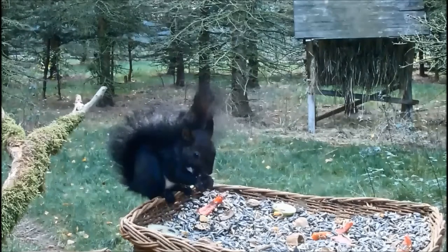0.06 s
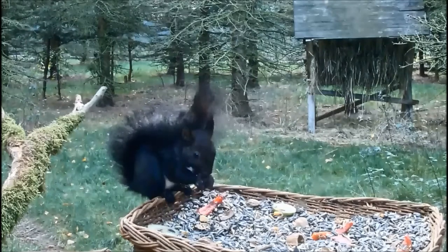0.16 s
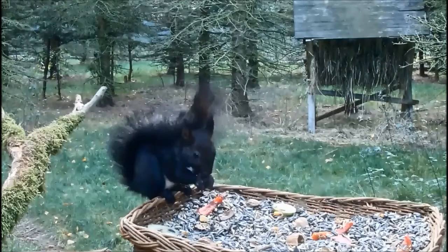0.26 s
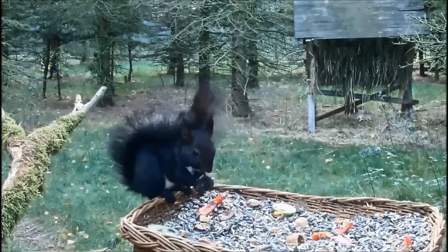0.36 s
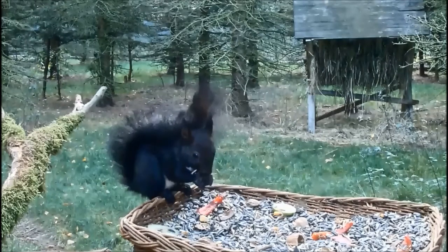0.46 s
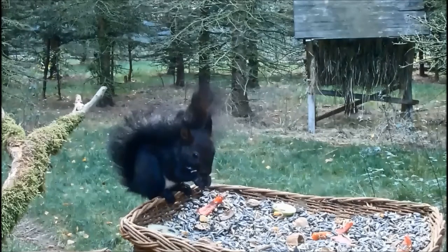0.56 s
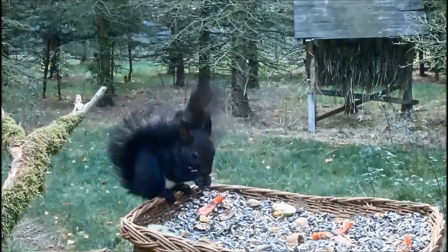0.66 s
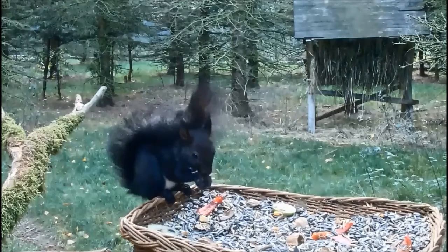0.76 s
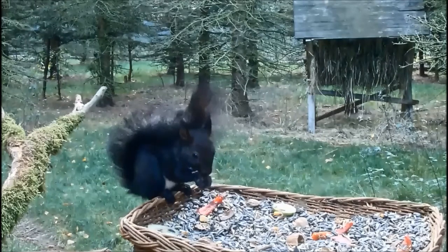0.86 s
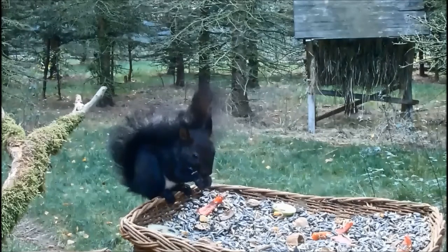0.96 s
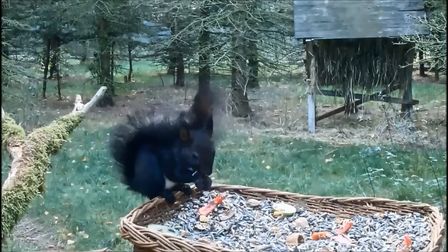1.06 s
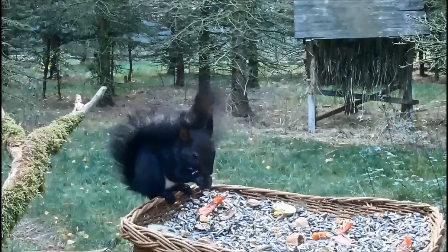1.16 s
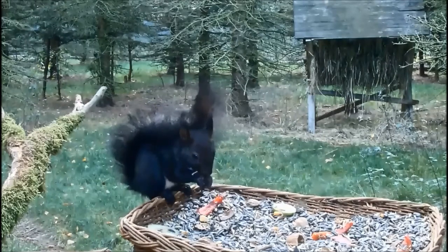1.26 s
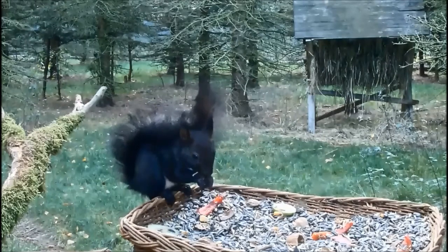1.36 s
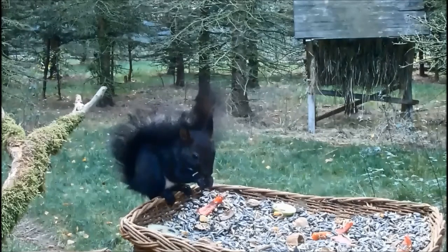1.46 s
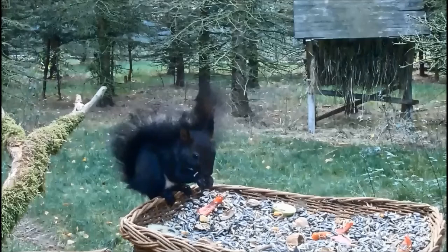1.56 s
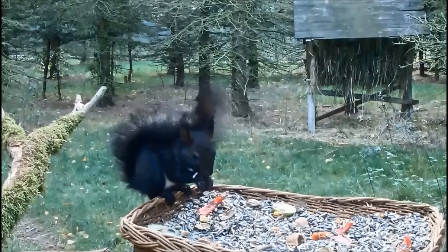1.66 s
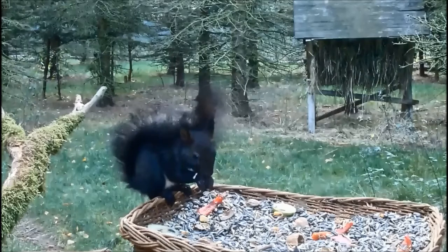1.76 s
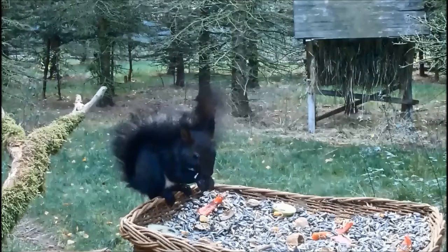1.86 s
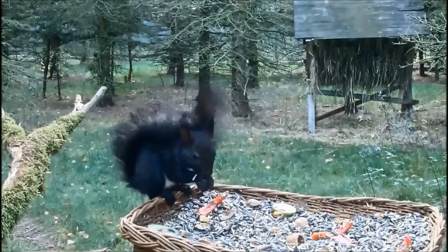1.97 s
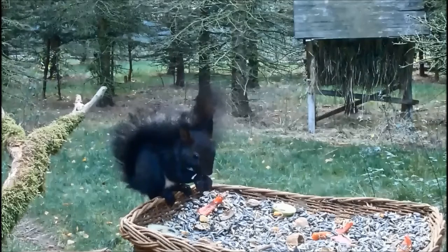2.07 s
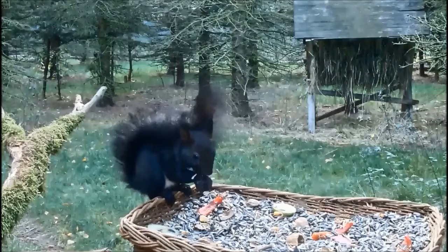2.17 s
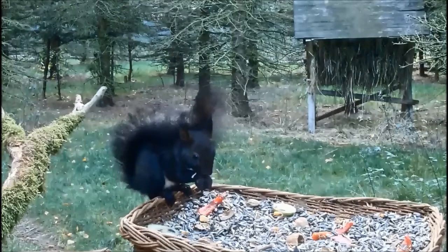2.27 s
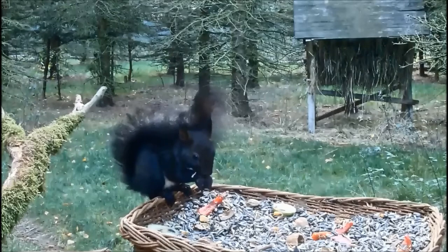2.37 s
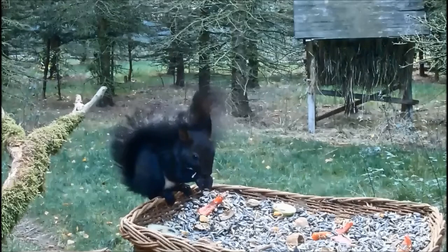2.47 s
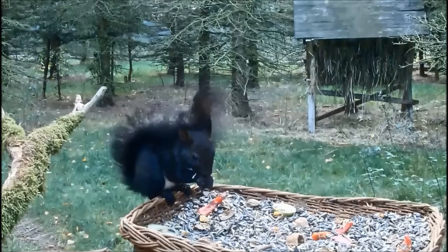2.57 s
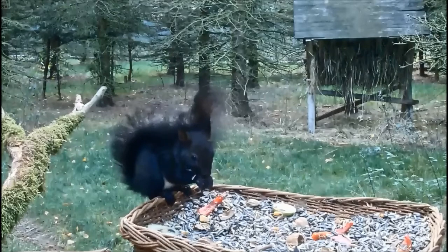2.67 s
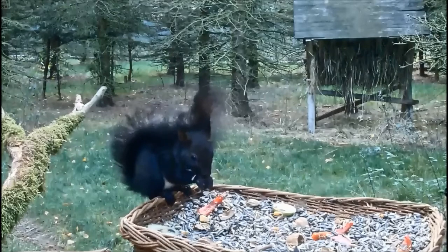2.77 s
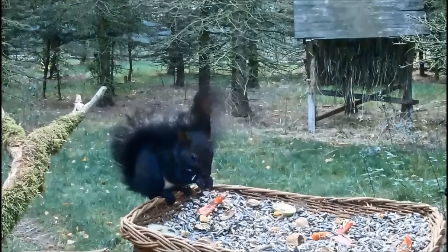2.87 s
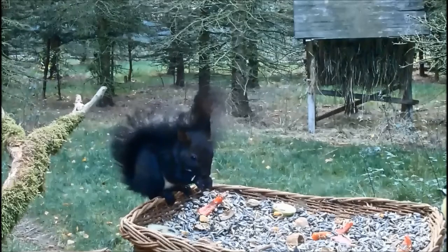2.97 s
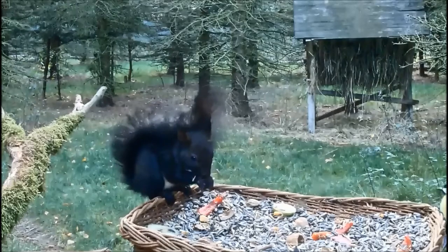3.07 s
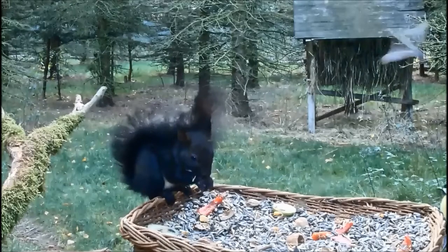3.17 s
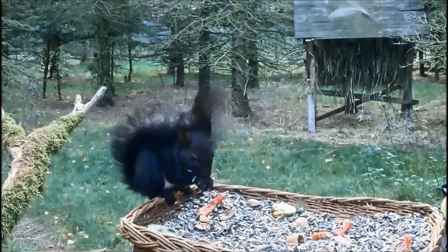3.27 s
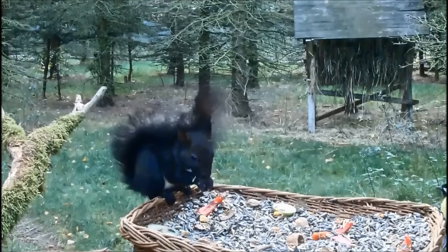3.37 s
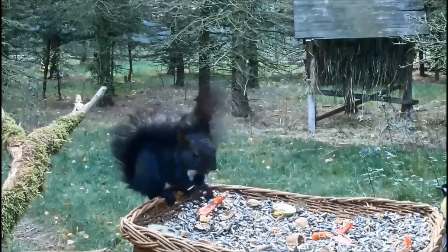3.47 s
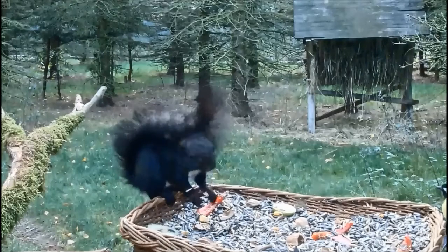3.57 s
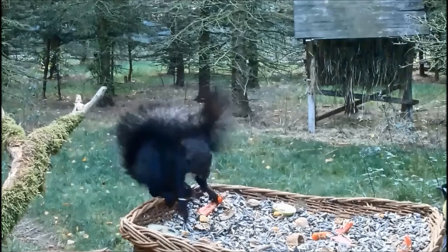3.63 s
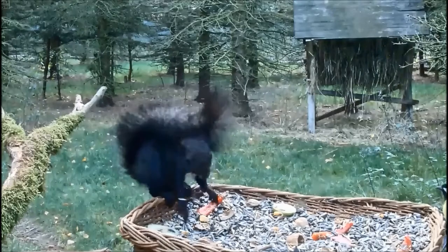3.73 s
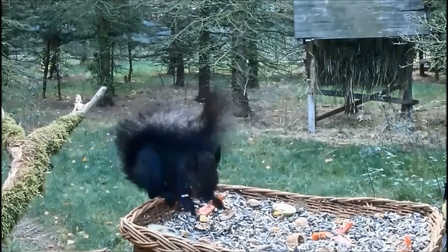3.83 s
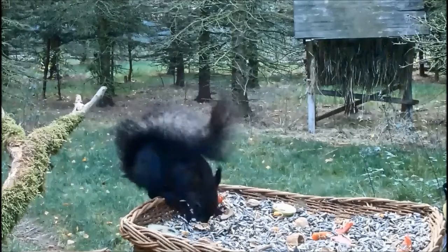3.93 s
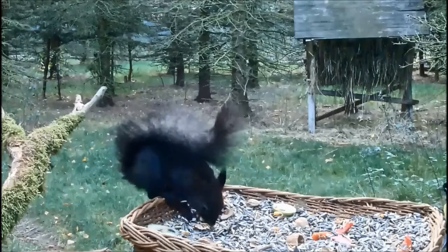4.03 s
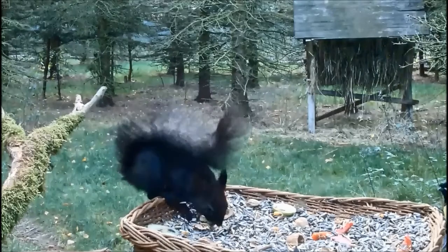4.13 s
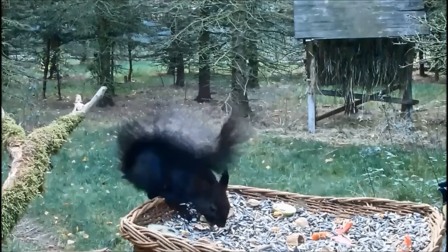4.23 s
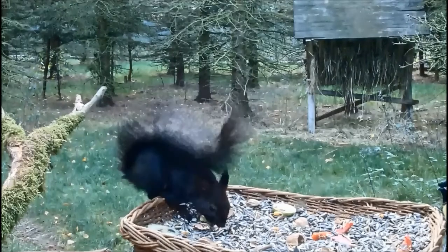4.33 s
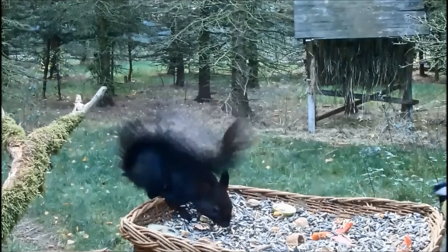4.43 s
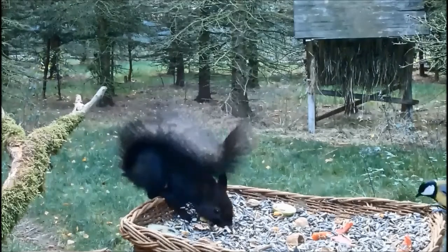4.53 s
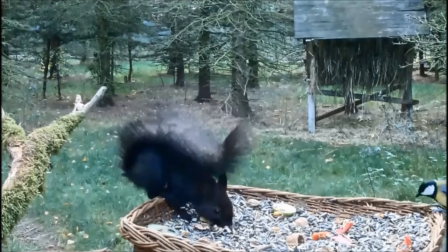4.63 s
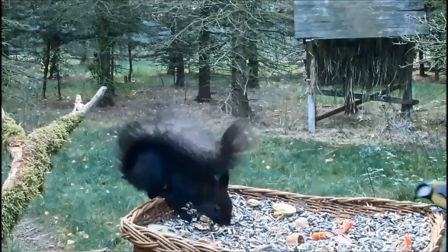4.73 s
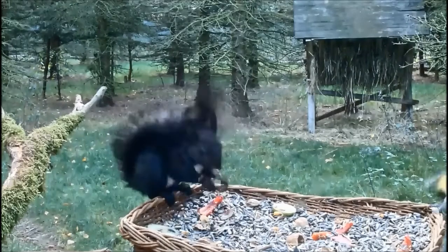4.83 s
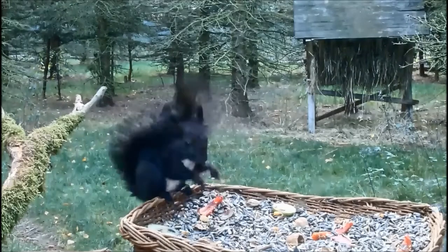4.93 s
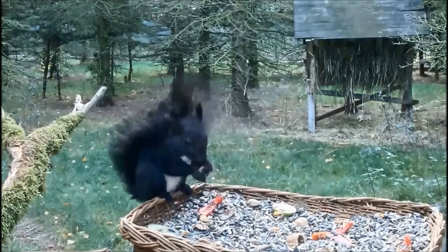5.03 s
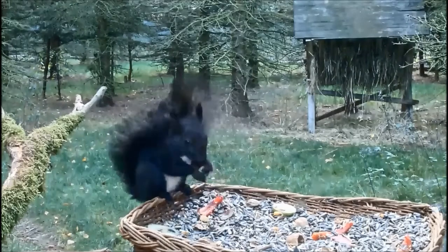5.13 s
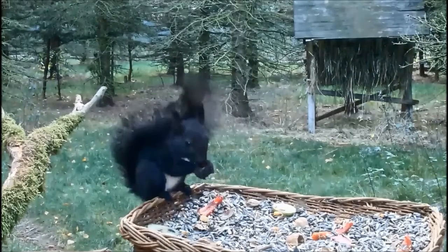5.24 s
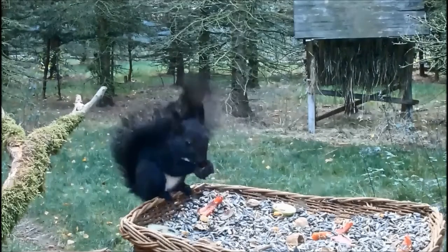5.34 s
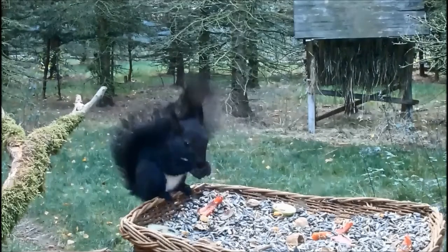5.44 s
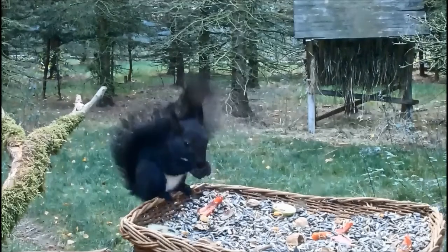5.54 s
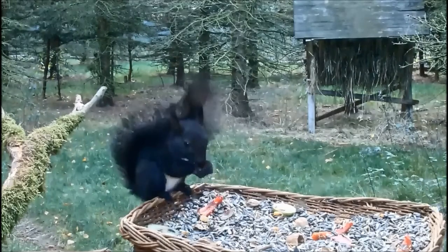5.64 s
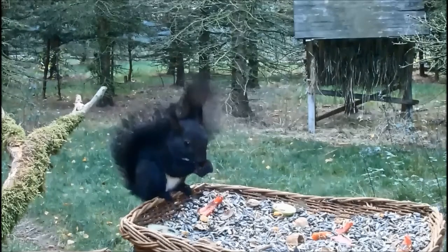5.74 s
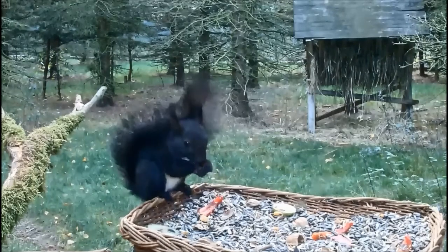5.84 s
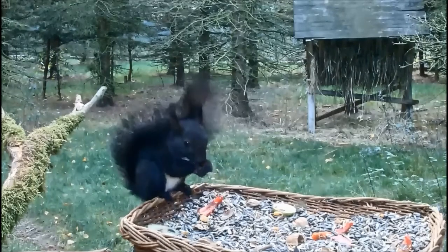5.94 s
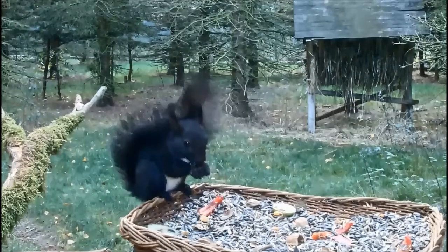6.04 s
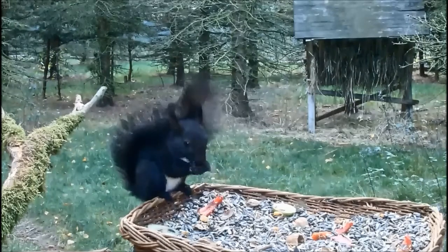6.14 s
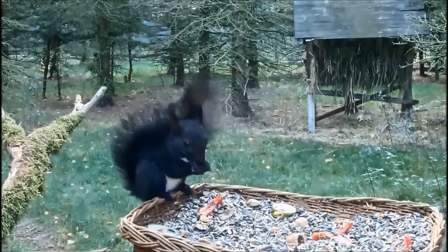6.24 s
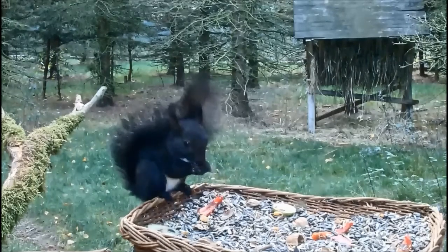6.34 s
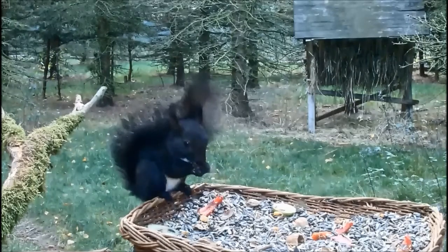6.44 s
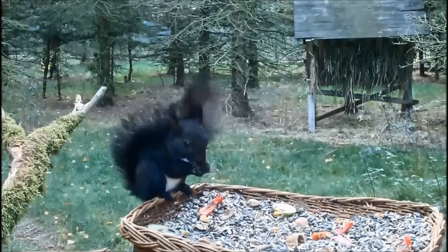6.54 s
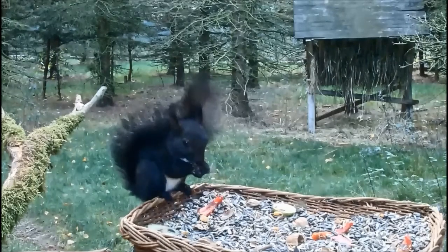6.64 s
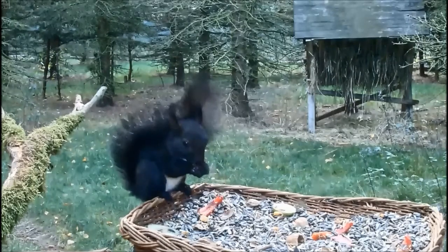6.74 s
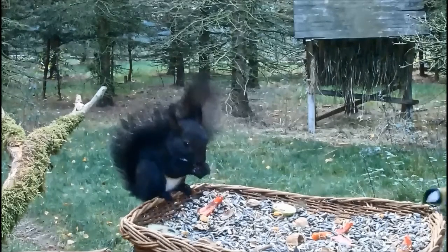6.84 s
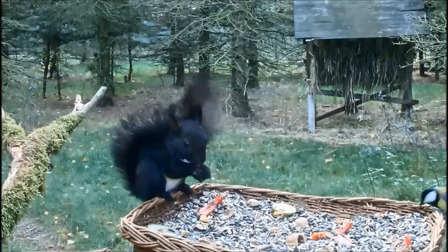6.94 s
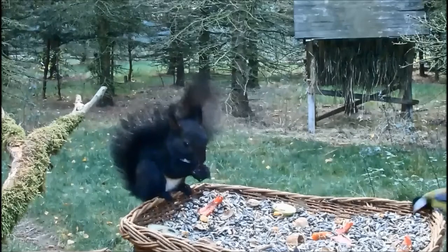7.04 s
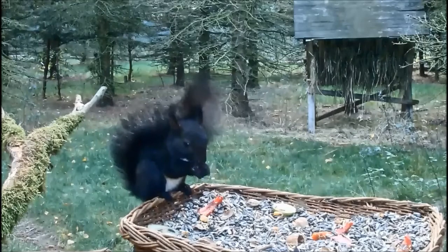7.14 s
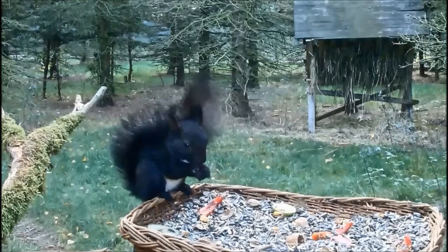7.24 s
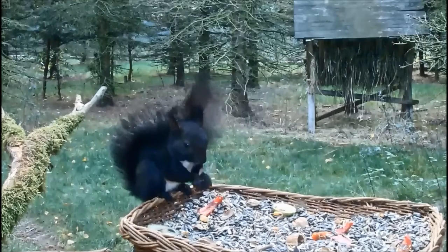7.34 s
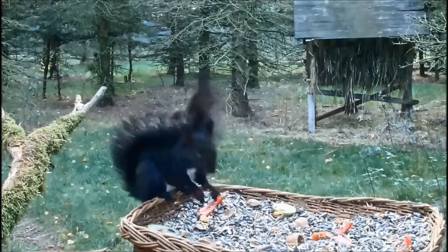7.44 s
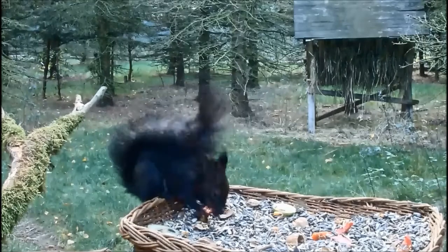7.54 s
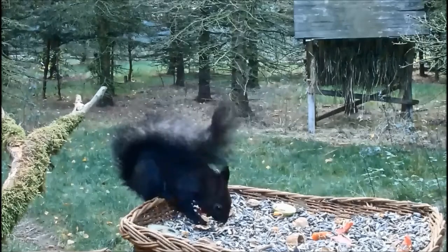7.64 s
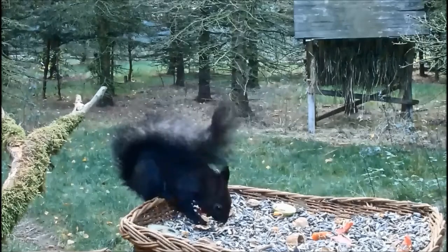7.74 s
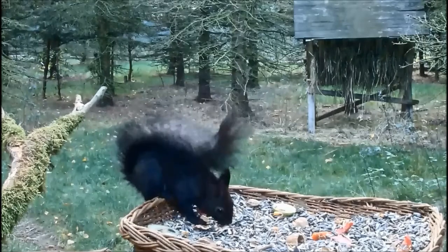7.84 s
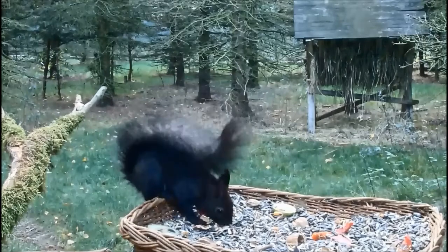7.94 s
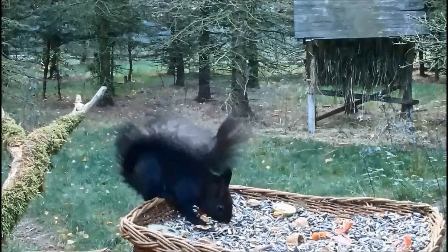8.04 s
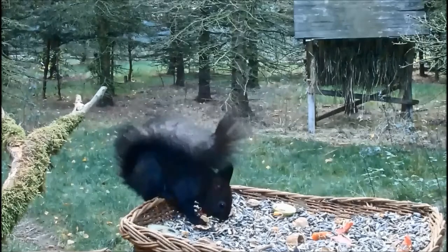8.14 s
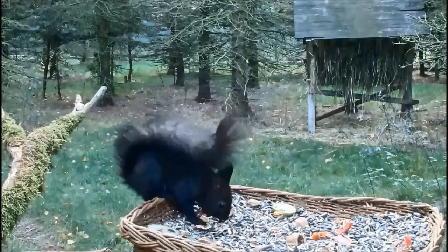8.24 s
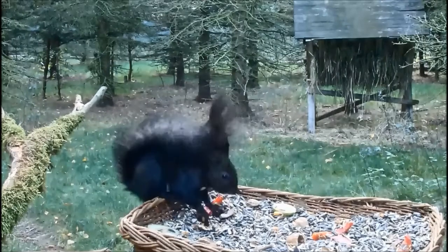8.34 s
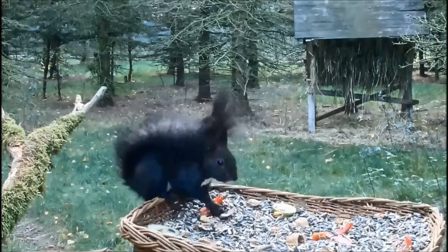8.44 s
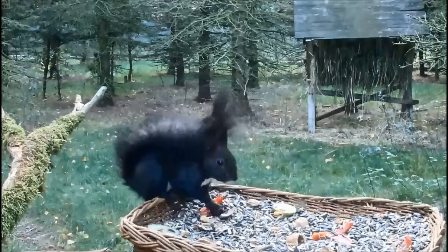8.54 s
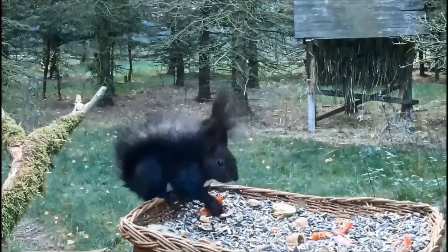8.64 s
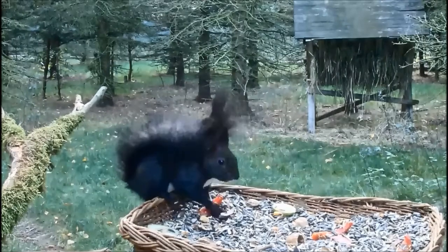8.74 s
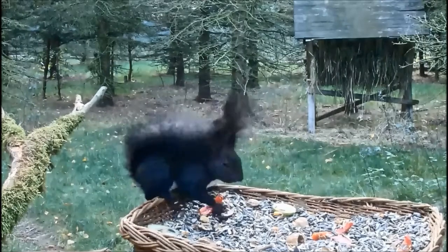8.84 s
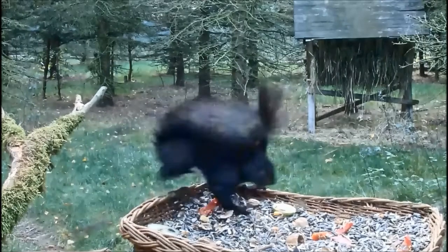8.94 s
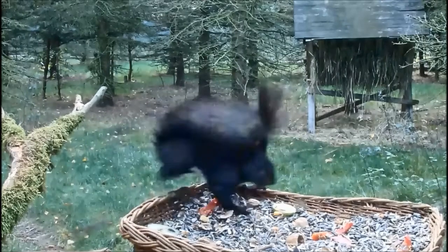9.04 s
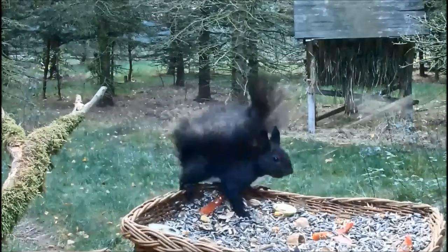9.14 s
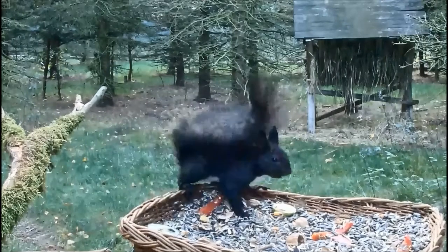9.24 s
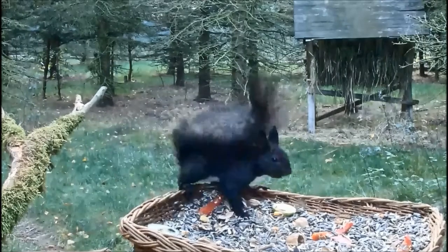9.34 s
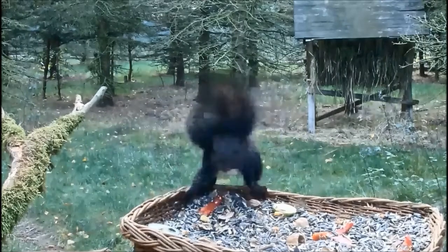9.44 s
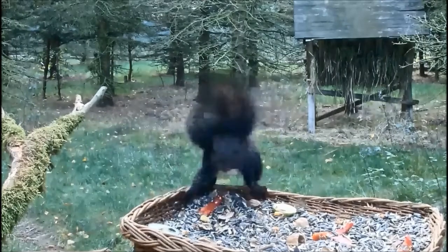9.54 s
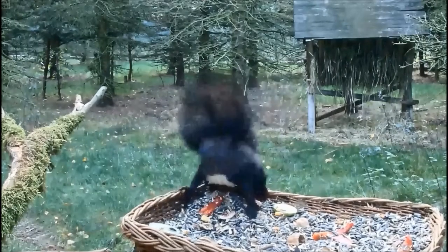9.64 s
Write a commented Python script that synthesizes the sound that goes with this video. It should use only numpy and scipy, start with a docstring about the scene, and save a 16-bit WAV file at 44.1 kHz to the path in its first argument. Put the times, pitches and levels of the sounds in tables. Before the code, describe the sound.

Crisp little seed cracks and high bird calls over a faint outdoor rumble, ending in louder rustling and bumps as a squirrel rummages.

```python
"""A squirrel cracks seeds on a wicker tray in a wood. Each crack makes the kernel and shell ring,
and loose husks rustle. Small birds chip, whistle and call in sliding tones that echo off the trees,
and one flutters past. Far traffic and wind make a low background. Near the end the squirrel turns and
rakes through the seeds: the tray rustles, thumps and shakes the microphone's mount."""
import sys
import numpy as np
from scipy import signal
from scipy.fft import rfft, irfft, next_fast_len
from scipy.io import wavfile
from scipy.ndimage import uniform_filter1d

SR = 44100
rng = np.random.default_rng(int(sys.argv[2]) if len(sys.argv) > 2 else 0)


def inscribe(sig):
    """Save sig as 16-bit PCM at rate SR to the path in sys.argv[1].

    A 1-D sig is mono; a 2-D sig holds one channel per row.
    Samples are clipped to [-1, 1] before scaling.
    """
    pcm = np.round(np.clip(np.atleast_2d(sig).T, -1, 1) * 32767)
    wavfile.write(sys.argv[1], SR, pcm.astype(np.int16))


N = 427769


def amp(db):
    return 10 ** (np.asarray(db) / 20)


def combined_gain(*db):
    """Add the power of several dB levels and give back one gain."""
    return np.sqrt(sum(amp(level) ** 2 for level in db))


def unit_power(x):
    return x / np.sqrt(np.mean(x ** 2) + 1e-20)


def value_at(points, hz):
    """Read between (Hz, value) points, giving each octave equal room."""
    freqs, values = np.transpose(points)
    return np.interp(np.log(hz + 1), np.log(freqs + 1), values)


def curves(rows):
    """Turn each column after the time into one value per sample."""
    times, *columns = np.transpose(rows)
    return [np.interp(np.arange(N) / SR, times, column) for column in columns]


def filtered(x, response):
    """Scale each frequency in x by response(hz)."""
    size = next_fast_len(N + SR // 2)
    return irfft(rfft(x, size) * response(np.fft.rfftfreq(size, 1 / SR)), size)[..., :N]


def add(track, start, sound):
    """Mix a sound into the track at a start time in seconds."""
    part = track[max(round(start * SR), 0):][:len(sound)]
    part += sound[:len(part)]


def noise(spectrum, patchy_db, grains=0, spread_db=0):
    """Noise with louder and softer patches; grains is the share of samples boosted into crackle."""
    spikes = (rng.random(N) < grains) * amp(spread_db * np.minimum(rng.exponential(size=N), 3))
    bands = signal.stft(rng.standard_normal(N) * (1 + spikes), nperseg=256)[2]
    drift = uniform_filter1d(uniform_filter1d(rng.standard_normal(bands.shape), 12, 0), 5, 1)
    patches = signal.istft(bands * amp(patchy_db * unit_power(drift)), nperseg=256)[1][:N]
    return unit_power(filtered(patches, lambda hz: amp(value_at(spectrum, hz))))


def tone(hz, gain):
    """A sine wave that follows a pitch and a gain, sample by sample."""
    return gain * np.sin(2 * np.pi * np.cumsum(hz) / SR)


def quaver(depth, samples):
    """The quick, random wobble in the loudness of a bird's voice."""
    return 1 + depth * unit_power(uniform_filter1d(rng.standard_normal(SR // 8), size=50))[:samples]


# How loud the far traffic is. Each row: time in seconds, level in dB.
TRAFFIC_LEVELS = [(0, -55.5), (3.67, -53.5), (4.7, -55.5), (5.46, -53), (7.08, -55), (7.38, -50.5),
                  (8.19, -54.5)]
# The tone of traffic, wind and far birds. Each row: frequency in Hz, relative level in dB.
RUMBLE_SPECTRUM = [(10, -9), (18, -0.5), (40, -0.5), (58, -6), (76, -4.5), (100, -13.5), (125, -19.5),
                   (160, -38), (280, -120)]
WIND_SPECTRUM = [(79, -23.5), (135, 3.5), (206, -3), (280, -5), (514, -5), (574, -6.5), (764, -4.5),
                 (1040, -8), (1210, -6.5), (1470, -18), (1690, -20.5), (2210, -28.5), (2600, -36.5),
                 (3380, -63), (5720, -120)]
TWITTER_SPECTRUM = [(1290, -38), (2200, -41), (2550, -1), (3940, 6), (5310, -10), (8000, -4), (10400, -16),
                    (17600, -120)]

def background(wind_db=-60, stir_db=-5, twitter_db=-77.5):
    """Traffic, wind and a blur of far birds. Raking shakes the mount and swells the two low sounds."""
    traffic_db, = curves(TRAFFIC_LEVELS)
    force_db, _, shake_db = raking()
    rumble = combined_gain(traffic_db, shake_db) * noise(RUMBLE_SPECTRUM, patchy_db=1.2)
    wind = combined_gain(wind_db, force_db + stir_db) * noise(WIND_SPECTRUM, patchy_db=0.86)
    return rumble + wind + amp(twitter_db) * noise(TWITTER_SPECTRUM, patchy_db=8)


# Spells of gnawing and nosing in the seeds.
# Each row: middle in seconds, length in seconds, level in dB, brightness in dB.
GNAWING = [(0.02, 0.26, -71.5, 4), (0.5, 0.15, -81, 4), (0.883, 0.078, -65, 0), (0.964, 0.053, -60.5, -1),
           (1.245, 0.083, -61.5, 0), (1.383, .14, -69, -4), (1.63, 0.2, -70.5, -1), (1.895, 0.28, -70, 2),
           (2.81, 0.54, -66, 1.5), (3.436, 0.36, -68.5, 5.5), (3.722, .12, -73, 8), (4.92, 0.096, -66.5, 3),
           (5.11, 0.18, -67.5, 0.5), (5.363, 0.44, -73.5, -8), (5.72, 0.31, -69, 0.5), (6.5, 0.45, -75, -3),
           (6.82, 0.27, -67.5, -2.5), (7.117, 0.3, -73, -8.5), (7.353, 0.26, -67, -4),
           (7.745, 0.48, -68.5, -9)]

def gnawing():
    """Each spell swells, holds and fades. Gives three dB curves: plain, minus and plus brightness."""
    t, power = np.arange(0, N, 64) / SR, 1e-14
    for middle, length, db, bright_db in GNAWING:
        swell = np.exp(-(2 * (t - middle) / length) ** 4)
        power = power + swell * amp(db + bright_db * np.array([[0], [-1], [1]])) ** 2
    return [np.interp(np.arange(N) / SR, t, 10 * np.log10(row)) for row in power]


# The tone of the tray, the husks and the fine chaff. Each row: frequency in Hz, relative level in dB.
WICKER_SPECTRUM = [(240, -32), (400, -8), (692, 3), (778, -8), (1030, -0.5), (1290, 8.5), (1460, 3),
                   (1720, 5.5), (2240, -6), (2600, -7), (3380, -8.5), (5720, -120)]
HUSK_SPECTRUM = [(1180, -26), (2000, -3.5), (2450, -8.5), (3420, 1), (3870, 3.5), (4450, 0), (5200, -6),
                 (6760, -41), (11400, -120)]
CHAFF_SPECTRUM = [(2650, -30), (4500, -11.5), (4930, -7.5), (5450, -4.5), (6510, -7), (9500, -29),
                  (12400, -65), (20900, -120)]

def rustle():
    """Husks and chaff shift like tiny grains, and the woven tray answers with a lower sound."""
    plain_db, dull_db, bright_db = gnawing()
    force_db, raked_db, _ = raking()
    wicker = noise(WICKER_SPECTRUM, patchy_db=2.5, grains=0.0032, spread_db=6)
    husks = noise(HUSK_SPECTRUM, patchy_db=1.8, grains=0.003, spread_db=7.5)
    chaff = noise(CHAFF_SPECTRUM, patchy_db=2.5, grains=0.0031, spread_db=8.5)
    # Each gain joins three levels: at rest, gnawing and raking.
    return (combined_gain(-70.5, dull_db - 3, force_db) * wicker
            + combined_gain(-74.5, plain_db, raked_db) * husks
            + combined_gain(-84, bright_db - 11, raked_db - 11) * chaff)


# Bird chips, and at 8.77 s one brief falling crackle from a seed. Each row: start in seconds, length in
# seconds, first and last pitch in Hz, level in dB.
CHIPS = [(0.015, .04, 3850, 3780, -60), (0.253, 0.013, 7500.0, 7400.0, -64),
         (1.251, 0.014, 3690, 2640.0, -48), (1.576, .012, 5960, 7500, -65), (1.592, .014, 4410, 3400, -57),
         (1.599, 0.022, 7450, 6640, -55), (1.665, 0.0195, 4190, 3480, -60),
         (1.746, 0.028, 4240, 3300.0, -62), (1.859, 0.014, 4460, 3210, -56.5),
         (1.972, 0.017, 3980, 3520, -61), (2.343, 0.024, 5600, 5200, -57), (2.636, 0.014, 7540, 6830, -68),
         (2.783, 0.015, 3970, 3070, -58), (2.829, 0.039, 7860, 6600, -64), (3.01, 0.019, 3730, 2690, -53.5),
         (4.042, .055, 4120, 4050, -69), (4.2, .022, 4100, 3900, -65), (4.235, .022, 3950, 3780, -66),
         (4.4, 0.024, 3950, 2430, -55), (4.463, 0.02, 3990, 2520, -51.5), (5.31, 0.018, 4150, 2620, -61),
         (5.57, 0.019, 3720, 2810.0, -58), (5.652, 0.018, 3600, 2500, -55), (5.729, 0.026, 3850, 2850, -52),
         (6.065, 0.033, 3550, 2910, -58), (6.224, 0.011, 3470, 2450, -54.5),
         (6.297, 0.031, 3910, 2550, -50), (6.414, 0.032, 3950, 2080, -51.5), (7.04, .09, 4020, 3980, -64),
         (7.13, .07, 4250, 4280, -66), (7.489, 0.031, 3950, 2450, -56), (7.521, .028, 2440, 2400, -65),
         (7.716, 0.021, 3710, 2870, -58), (8.135, 0.019, 3820, 2630, -50), (8.213, 0.028, 3980, 2750, -47),
         (8.77, .007, 5900, 4500, -41), (9.05, 0.022, 4450, 3800, -40), (9.092, 0.019, 2950, 3350, -41),
         (9.297, 0.025, 3500, 2850, -41.5)]

def chips():
    """Nearby birds make very short tones, nearly all sliding down. The very brief one at 8.77 s is a seed
    crackling under the paws."""
    track = np.zeros(N)
    for start, length, first_hz, last_hz, db in CHIPS:
        progress = np.arange(round(length * SR)) / (length * SR)
        pitch = first_hz + (last_hz - first_hz) * progress
        swell = np.sin(np.pi * progress) ** 0.7  # a power under 1 holds the level longer
        add(track, start, tone(pitch, amp(db) * swell * quaver(0.36, len(pitch))))
    return track


def ticks(per_second, start, floor_db):
    """Rows for small cracks at random times after start, each at least floor_db(time) loud."""
    span = N / SR - start
    when, pitch, kernel, shell = rng.random((round(per_second * span), 4)).T
    times = start + when * span
    kernel_db, shell_db = floor_db(times) - 4.5 * np.log(1 - 0.95 * np.array([kernel, shell]))
    return list(zip(times, kernel_db, 3100 + 1300 * pitch, shell_db))


# Seeds cracking. Each row: start in seconds, kernel peak in dB, kernel pitch in Hz, shell peak in dB.
CRACKS = [(0.098, -55, 3000, -66), (0.1733, -35.5, 3880, -47), (0.279, -49, 3700, -64),
          (0.305, -51, 3860, -61), (0.3354, -55, 3100.0, -54), (0.4464, -49, 3680, -42.5),
          (0.451, -55, 4400.0, -41), (0.4911, -66, 4000, -58), (0.517, -49, 4220, -54),
          (0.521, -50, 3750, -49), (0.529, -60, 3900.0, -43), (0.5634, -62, 4500.0, -48),
          (0.593, -43.5, 3150, -65), (0.7236, -39, 4200, -63), (0.745, -44, 3880, -41.5),
          (0.9098, -48, 3190, -64), (1.0006, -48, 3970, -58), (1.0443, -52, 3930, -58),
          (1.092, -41, 3920, -51), (1.1725, -50, 3200.0, -53), (1.1925, -43.5, 3880, -56),
          (1.2244, -49, 4500, -58), (1.2794, -48, 3870, -56), (1.3164, -49, 3100, -66),
          (1.3533, -56, 3740, -58), (1.513, -48, 3600, -54), (1.5975, -51, 3600.0, -48),
          (1.612, -49, 4200.0, -51), (1.7055, -46, 2900.0, -51), (1.796, -58, 4200.0, -53),
          (1.8395, -47, 2800, -58), (1.8927, -49, 4370, -50), (1.9094, -48, 3550, -60),
          (2.046, -46.5, 3760, -54), (2.083, -50, 4000.0, -69), (2.2915, -44.5, 4260, -42.5),
          (2.598, -48, 3830, -66), (2.6426, -53, 3500.0, -51), (2.8288, -49, 3600.0, -47),
          (3.008, -51, 4000.0, -54), (3.0244, -48, 3200.0, -64), (3.2746, -63, 4000.0, -50),
          (3.2827, -53, 3620, -58), (3.612, -48, 3740, -59), (3.7191, -42, 3700, -43),
          (3.9163, -38.5, 4100, -47), (3.9203, -56, 3700.0, -54), (4.0809, -51, 3440, -51.5),
          (4.585, -49, 3920, -63), (4.7953, -53, 3630, -50), (4.945, -56, 3800.0, -58),
          (5.0687, -47, 4060, -49), (5.246, -50, 3900.0, -50), (5.2967, -47, 4020, -59),
          (5.5321, -54, 3720, -54), (5.6845, -37, 4550, -56), (5.6881, -39, 4370, -39),
          (5.9841, -43, 3400, -49), (5.9884, -44, 3420, -61), (6.3847, -44, 4000, -45),
          (6.542, -50, 3020, -51), (6.5857, -49, 4000.0, -59), (6.5923, -45, 4000.0, -53),
          (6.6152, -48, 4120, -57), (6.7848, -48, 3620, -53), (6.8202, -48, 4340, -61),
          (6.8496, -47, 3550, -45.5), (6.926, -52, 3900.0, -65), (6.9469, -42, 4080, -50),
          (6.952, -52, 4400.0, -53), (7.007, -61, 3950, -51), (7.2775, -49, 3820, -57),
          (7.367, -46, 4430, -45.5), (7.374, -54, 4100.0, -53), (7.4572, -53, 3300.0, -56),
          (7.5904, -51.5, 3600.0, -66), (7.7351, -46, 3800.0, -56), (7.7405, -44, 4240, -60),
          (7.8643, -54, 3920, -58), (7.986, -54, 4100, -59), (8.0616, -52, 3400.0, -49),
          (8.1858, -51, 3740, -59), (8.228, -46, 3200.0, -54), (8.2804, -44, 3000.0, -62),
          (8.5193, -42, 3200.0, -47), (8.5926, -42, 4300.0, -39), (8.7834, -39, 3300.0, -39.5),
          (9.1592, -42, 3700.0, -36.5), (9.1973, -38, 3860, -40), (9.2325, -32.5, 3220, -41),
          (9.331, -35, 3430, -48), (9.3847, -33, 3100.0, -45), (9.6662, -25.5, 3480, -33),
          (9.6698, -25, 2820, -43)]

def cracks():
    """A seed breaks in a tiny burst that makes its kernel, shell and splinters ring."""
    track, t = np.zeros(N), np.arange(SR // 60) / SR
    faint_ticks = ticks(per_second=8, start=0, floor_db=lambda times: -64)
    for start, kernel_db, kernel_hz, shell_db in [*CRACKS, *faint_ticks, *crunches()]:
        burst = rng.standard_normal(len(t)) * amp(-60 * t / 0.014)
        burst[0] = 2.7  # the break starts with a sharp kick
        splinter_db = min(shell_db, -46) - 4.5
        rings = [(kernel_db, kernel_hz, 1600), (shell_db, 5500, 2600), (splinter_db, 11000, 9000)]
        for db, hz, width_hz in rings:
            ring = t * np.exp(-np.pi * width_hz * t) * np.sin(2 * np.pi * hz * t)
            struck = np.convolve(burst, ring[:160])[:len(t)]
            add(track, start, amp(db) * struck / np.abs(struck).max())
    return track


# Needle-thin snaps. Each row: start in seconds, level in dB before the low end is cut.
SNAPS = [(0.1733, -44), (0.2079, -39), (0.7442, -33), (4.37, -39), (5.688, -40), (5.7508, -39),
         (7.0045, -45), (7.1516, -42)]

def snaps(pitch_hz=12400, fade_s=0.0001, low_cut_hz=4000):
    """A very high ring that dies within a cycle or two."""
    track, t = np.zeros(N), np.arange(SR // 500) / SR
    for start, db in SNAPS:
        add(track, start, amp(db) * np.exp(-t / fade_s) * np.cos(2 * np.pi * pitch_hz * t))
    return filtered(track, lambda hz: hz ** 2 / (hz ** 2 + low_cut_hz ** 2))


# Held whistles. Each row: start in seconds, length in seconds, note in Hz, level in dB.
WHISTLES = [(.24, 0.039, 3900, -62), (4.49, 0.11, 4010, -65.5), (5.043, .05, 4040, -64),
            (5.068, 0.061, 3216, -64), (5.23, 0.11, 4090, -65), (5.398, 0.084, 4280, -52.5),
            (5.579, .082, 4240, -48.5), (5.779, 0.076, 4254, -49.5), (6.11, 0.087, 4335, -63.5),
            (6.189, 0.086, 4250, -54.5), (6.349, 0.088, 4225, -53), (6.542, 0.088, 4220, -57.5),
            (7.296, 0.044, 4230, -60), (7.882, 0.07, 4090, -60)]

def whistles():
    """Birds deep in the wood slide up into a note, then let it sag a little."""
    track = np.zeros(N)
    for start, length, note_hz, db in WHISTLES:
        t = np.arange(0, length, 1 / SR)
        scoop = 1.04 - 0.2 * np.exp(-t / 0.011) - 0.55 * t
        swell = np.clip(t / 0.04, 0.55, 1) * np.clip((length - t) / 0.0056, 0, 1)
        add(track, start, tone(note_hz * scoop, amp(db) * swell * quaver(0.16, len(t))))
    return track


# Taps on the tray. Each row: start in seconds, level in dB, pitch in Hz.
KNOCKS = [(0.518, -47, 1720), (1.919, -45, 497), (2.64, -44, 1190), (3.515, -50, 1780), (5.239, -47, 248),
          (5.245, -44, 680), (5.29, -42, 550), (5.47, -47, 260), (7.329, -44, 330), (7.417, -48, 1350),
          (7.457, -49, 1250), (7.508, -49, 1150), (7.591, -52, 1980), (7.734, -46, 1700),
          (8.001, -51, 1850), (8.26, -49, 1110), (8.28, -36, 1650), (8.318, -43, 1250), (8.79, -25, 1250),
          (8.8965, -27.5, 1490), (9.018, -28.5, 270), (9.33, -26, 1820), (9.666, -28.5, 1980),
          (9.67, -27.5, 1160), (9.68, -28, 1210)]

def knocks():
    """Taps sound dull because wicker stops every pitch from ringing almost at once."""
    track, t = np.zeros(N), np.arange(SR // 10) / SR
    for start, db, hz in KNOCKS:
        ring = np.sin(2 * np.pi * hz * t) * amp(-60 * t / 0.02)
        scuff = uniform_filter1d(rng.standard_normal(len(t)), size=6) * amp(-60 * t / 0.011)
        add(track, start, amp(db) * (ring + 0.11 * scuff))
    return track


# Nasal calls. Each row: start in seconds, base level in dB.
NASAL_CALLS = [(.828, -55), (0.936, -54), (3.413, -56.5), (3.511, -56), (3.686, -54), (3.781, -55.5)]
# The rise of one call. Each row: time into the call in seconds, base pitch in Hz.
NASAL_RISE = [(0, 996), (.014, 1370), (0.021, 1813), (.031, 2280), (.046, 2330)]
# The overtones that sound. Each row: multiple of the base pitch, level change in dB.
NASAL_OVERTONES = [(2, -3), (3, -10), (4, -15)]
# How the beak shapes them. Each row: frequency in Hz, level change in dB.
BEAK_RESPONSE = [(1900, -13), (2400, -3.5), (3000, -12), (3900, 5), (4700, -4.5), (6800, -10), (7600, -30)]

def nasal_calls():
    """A hoarse bird voice: overtones rise together and are shaped by the beak."""
    track = np.zeros(N)
    times, hz = np.transpose(NASAL_RISE)
    t = np.arange(0, times[-1], 1 / SR)
    pitch = np.interp(t, times, hz)
    swell = np.sqrt(np.sin(np.pi * t / times[-1]))
    for start, db in NASAL_CALLS:
        rasp = swell * quaver(0.7, len(t))
        for multiple, overtone_db in NASAL_OVERTONES:
            gain = amp(db + overtone_db + value_at(BEAK_RESPONSE, multiple * pitch))
            add(track, start, tone(multiple * pitch, gain * rasp))
    return track


# Low thumps. Each row: middle in seconds, peak in dB, length in seconds.
THUMPS = [(1.912, -41.5, 0.0078), (1.926, -47, 0.006), (2.349, -49, 0.0042), (5.48, -44, 0.01),
          (7.334, -43, 0.006), (9.018, -21, 0.021), (9.048, -22, 0.018), (9.066, -27, 0.0072),
          (9.085, -32, 0.028)]

def thumps():
    """Slow pushes reach the microphone through its mount, each the opposite way to the last."""
    track, t = np.zeros(N), np.arange(SR // 10) / SR
    for k, (middle, db, length) in enumerate(THUMPS):
        distance = 8 * ((t - 0.05) / length) ** 2  # grows away from the middle
        add(track, middle - 0.05, (-1) ** k * amp(db) * (1 - distance) * np.exp(-distance))
    return track


# A small bird flutters past. Each row: time in seconds, level in dB.
FLYBY_LEVELS = [(2.68, -90), (2.74, -65), (2.9, -66), (3.03, -65), (3.12, -65), (3.17, -88)]
# The tone of air through feathers. Each row: frequency in Hz, relative level in dB.
FEATHER_SPECTRUM = [(150, -20), (300, 2), (700, 6), (1400, -12.5), (1950, 2.5), (2500, -19), (4000, -5),
                    (8000, -28), (12000, -58)]

def wings(beats_per_s=23.4):
    """Every downstroke makes one short puff of air."""
    strokes = np.cos(np.pi * beats_per_s * (np.arange(N) / SR - 2.982)) ** 6
    return amp(curves(FLYBY_LEVELS)[0]) * unit_power(strokes) * noise(FEATHER_SPECTRUM, patchy_db=0.7)


def add_high_note(track, points, undertone_db=-18):
    """A voice follows (seconds, Hz, dB) points, with a weaker tone an octave below."""
    times, hz, db = np.transpose(points)
    t = np.arange(times[0], times[-1], 1 / SR)
    fade = np.clip(np.minimum(t - times[0], times[-1] - t) / 0.0026, 0, 1)
    pitch = np.interp(t, times, hz)
    gain = amp(np.interp(t, times, db)) * fade * quaver(0.16, len(t))
    add(track, times[0], tone(pitch, gain) + tone(pitch / 2, amp(undertone_db) * gain))


# One zigzag. Each row: time in seconds before stretching, pitch in Hz, level change in dB.
ZIGZAG_SHAPE = [(0, 7400, -4), (.009, 8300, -1), (0.017, 9600, -5), (0.024, 8750, 0), (.034, 9650, -4),
                (.044, 5800, 6)]
# Zigzag calls. Each row: start in seconds, base level in dB, time stretch (over 1 is slower).
ZIGZAGS = [(3.363, -53, 1.02), (9.468, -47, 0.87)]
# Thin sinking notes. Each row: start in seconds, length in seconds, first and last pitch in Hz,
# level in dB, random pitch scatter in Hz.
SEEPS = [(3.396, .082, 7490, 6790, -48.5, 40), (3.416, 0.079, 8630, 8300, -58.5, 150)]
# Notes that climb, then drop. Each row: start and climb time in seconds, first pitch in Hz, level in dB.
HOOKS = [(9.569, 0.016, 7440, -42.5), (9.598, .016, 6260, -37.5)]

def high_calls(waver_hz=200, wavers_per_s=33, top_hz=9100, end_hz=5500, hold_s=0.004, drop_s=0.006):
    """A tit sings thin, high tones: fast zigzags, wavering seeps and hooked notes."""
    track = np.zeros(N)
    for start, db, stretch in ZIGZAGS:
        points = [(start + stretch * at, hz, db + change) for at, hz, change in ZIGZAG_SHAPE]
        add_high_note(track, points, undertone_db=-8)
    for start, length, first_hz, last_hz, db, scatter_hz in SEEPS:
        t = np.linspace(0, length, num=24)
        pitch = first_hz + (last_hz - first_hz) * t / length
        pitch += waver_hz * np.cos(2 * np.pi * wavers_per_s * t)
        pitch += scatter_hz * rng.standard_normal(len(t))
        add_high_note(track, np.c_[start + t, pitch, db - 12 * (t / length) ** 4])
    for start, climb, hz, db in HOOKS:
        top = start + climb
        rise = [(start, hz, db), (start + climb / 2, (hz + top_hz) / 2, db), (top, top_hz, db - 15)]
        fall = [(top + hold_s, top_hz, db - 15), (top + hold_s + drop_s, end_hz, db)]
        add_high_note(track, rise + fall)
    return track


# The squirrel turns and rakes. Each row: time in seconds, force on the tray in dB,
# then the dB added to that force for the husks and for the shaking mount.
RAKING = [(8.05, -84, -14, 0), (8.23, -60, -9, -2), (8.35, -55, -13.5, 4), (8.47, -47, -11, 7.5),
          (8.65, -45.5, -9, 3), (8.78, -43, -6.5, 1.5), (8.88, -44.5, -10.5, 2.5), (9.05, -44.5, -6.5, 3.5),
          (9.27, -48, -5.5, 2.5), (9.45, -44, -7.5, 6.5), (9.7, -41.5, -6.5, 0.5)]

def raking():
    """Paws push the tray, move the husks and shake the mount. Gives a dB curve for each."""
    force_db, husks_db, shake_db = curves(RAKING)
    return force_db, force_db + husks_db, force_db + shake_db


def crunches():
    """Rows for seeds crunching under the paws, louder as the raking gets harder."""
    at, force_db, husks_db, _ = np.transpose(RAKING)
    crunch_db = force_db + husks_db + 1.5
    return ticks(per_second=65, start=at[0], floor_db=lambda times: np.interp(times, at, crunch_db))


# The wood's echo. Each row: frequency in Hz, seconds to fade by 60 dB before stretching.
ECHO_TIMES = [(300, 0.3), (4000, 0.27), (10000, 0.25)]

def tree_echo(sound, stretch):
    """Trunks scatter the sound back, and high pitches fade a little sooner."""
    hz, t, bands = signal.stft(rng.standard_normal(SR), SR, nperseg=256)
    fade_s = stretch * value_at(ECHO_TIMES, hz)[:, None]
    tail = signal.istft(bands * amp(-60 * t / fade_s), SR, nperseg=256)[1]
    return signal.fftconvolve(sound, tail / np.linalg.norm(tail))[:N]


def scene():
    """Mix everything into one channel. Far birds get a stronger, longer echo."""
    tray = cracks() + snaps() + knocks() + thumps()
    near_birds = chips()
    far_birds = whistles()
    near_birds += nasal_calls() + high_calls()
    echo = tree_echo(amp(-9.5) * tray + amp(-6) * near_birds, stretch=1)
    echo += tree_echo(amp(-4) * far_birds, stretch=2.3)
    return (background() + rustle() + wings() + tray + near_birds + far_birds + echo)[None]


# The microphone's dull treble and the amplifier's hiss. Each row: frequency in Hz, relative level in dB.
MIC_RESPONSE = [(7000, 0), (9000, -3.5), (14000, -23)]
HISS_SPECTRUM = [(2940, -52), (5000, -10), (5590, -31.5), (7590, 1.5), (13000, 1.5), (14000, -2)]

def record(dry, hiss_db=-80, top_hz=14050):
    """The microphone dulls the treble, the amplifier adds hiss, and all above top_hz is cut."""
    heard = filtered(dry, lambda hz: amp(value_at(MIC_RESPONSE, hz)))
    hiss = amp(hiss_db) * noise(HISS_SPECTRUM, patchy_db=-1)
    return filtered(heard + hiss, lambda hz: hz < top_hz)


dry = scene()
out = record(dry)
inscribe(out)
```